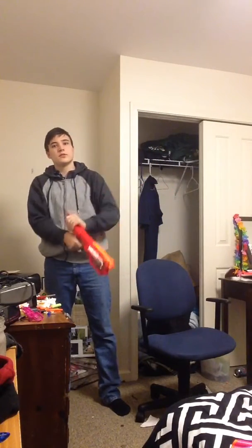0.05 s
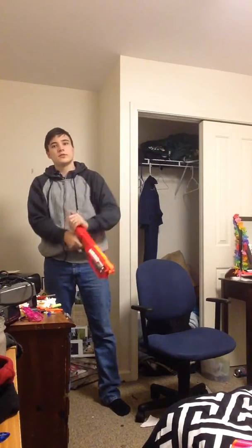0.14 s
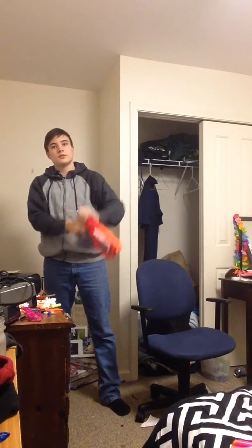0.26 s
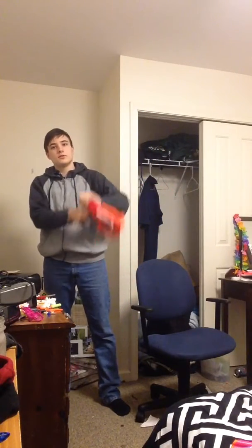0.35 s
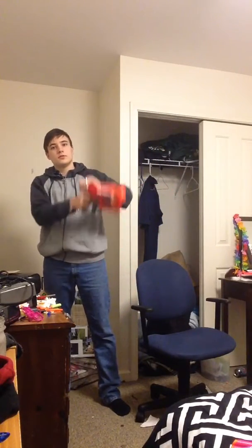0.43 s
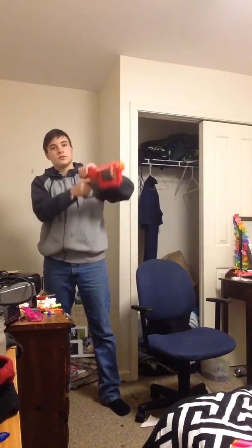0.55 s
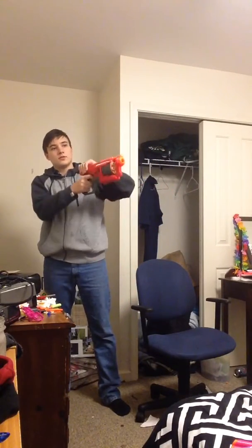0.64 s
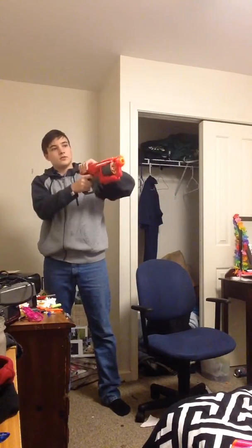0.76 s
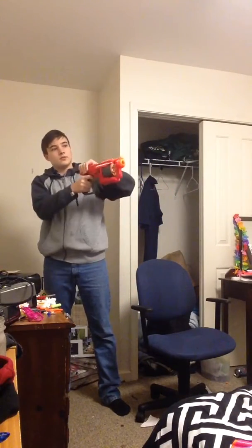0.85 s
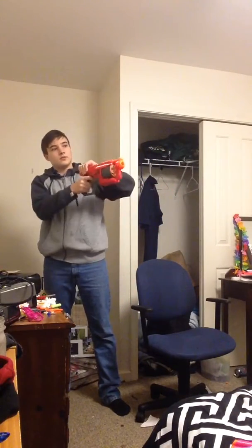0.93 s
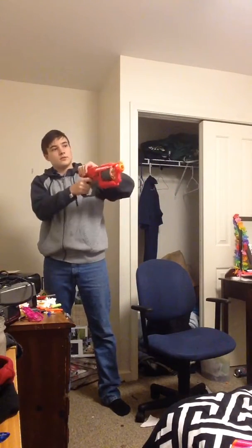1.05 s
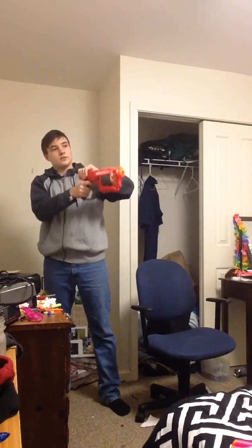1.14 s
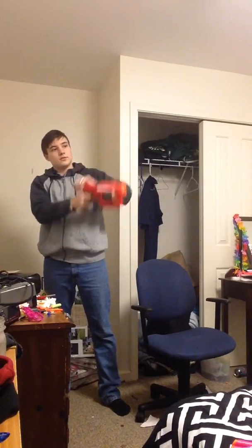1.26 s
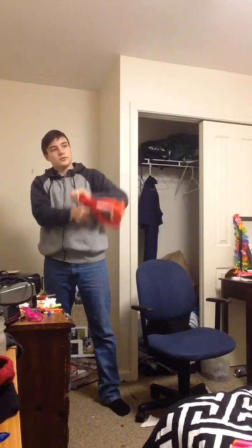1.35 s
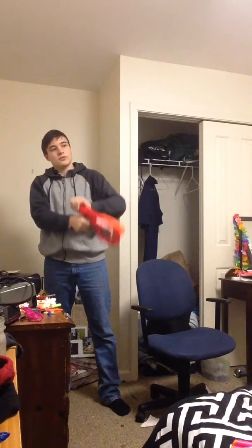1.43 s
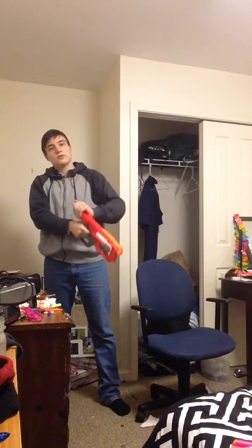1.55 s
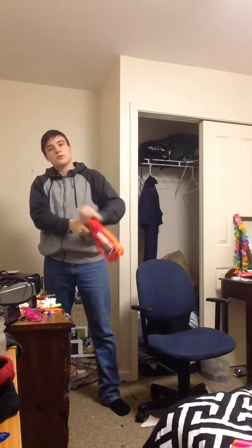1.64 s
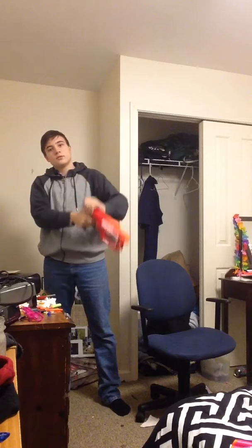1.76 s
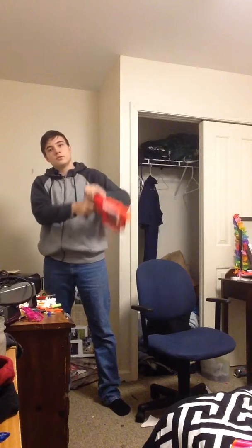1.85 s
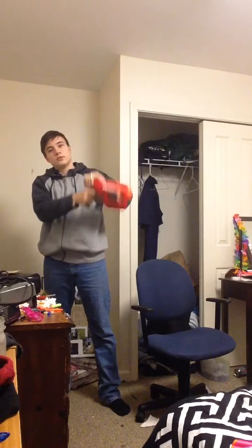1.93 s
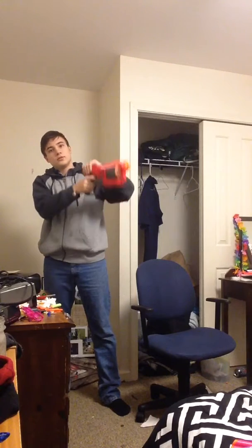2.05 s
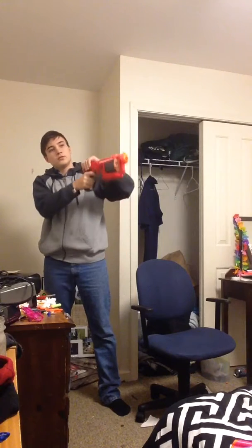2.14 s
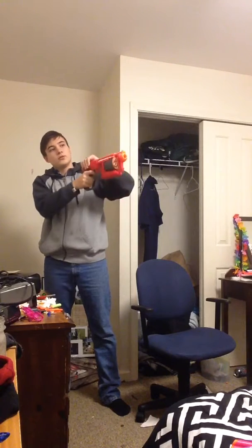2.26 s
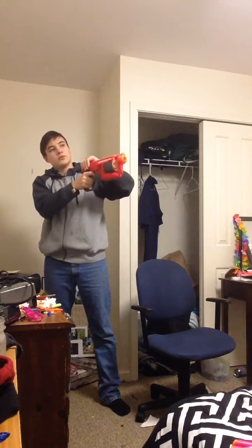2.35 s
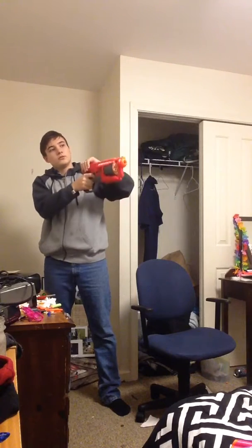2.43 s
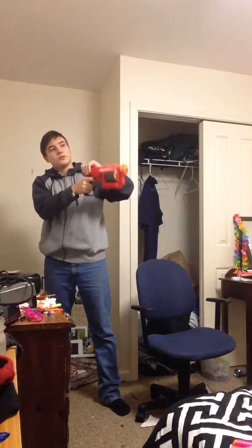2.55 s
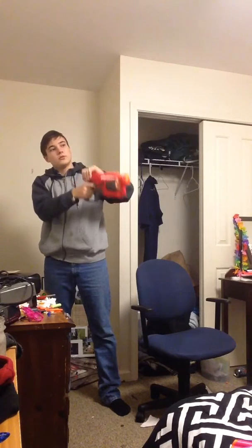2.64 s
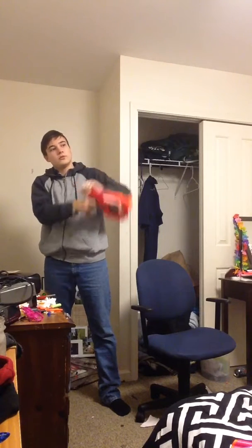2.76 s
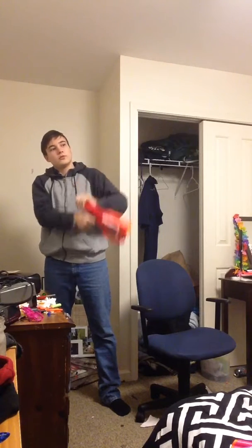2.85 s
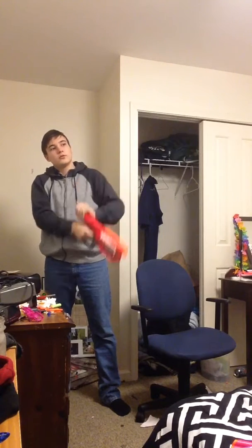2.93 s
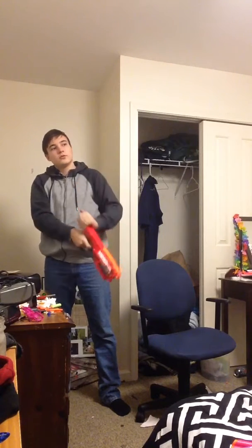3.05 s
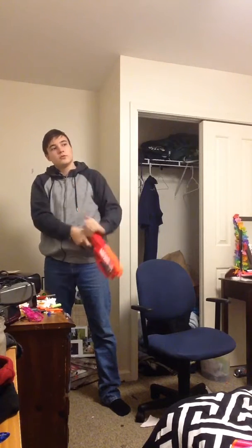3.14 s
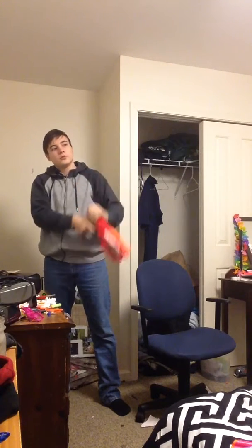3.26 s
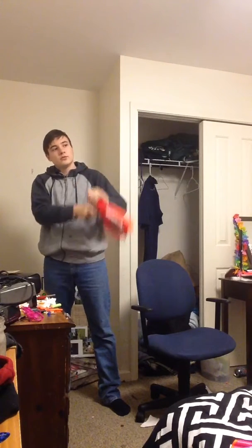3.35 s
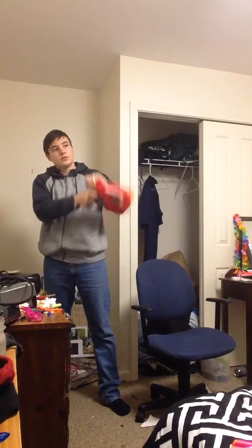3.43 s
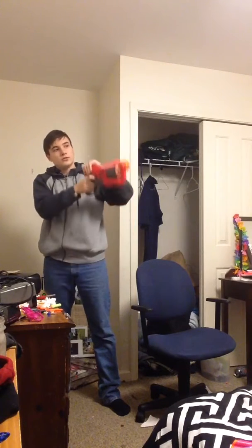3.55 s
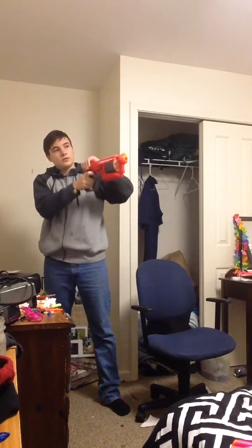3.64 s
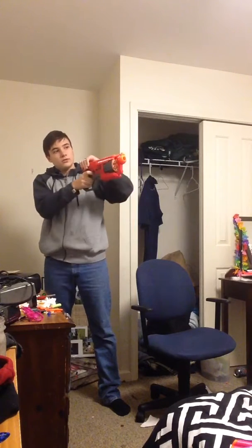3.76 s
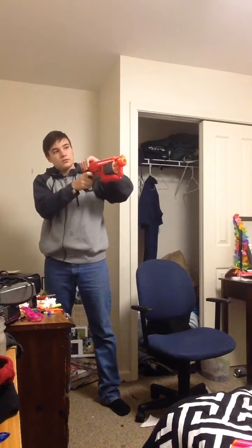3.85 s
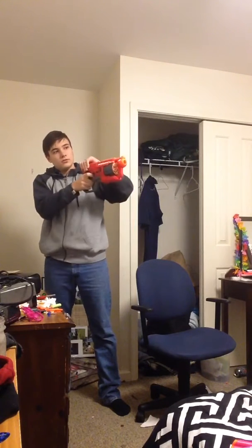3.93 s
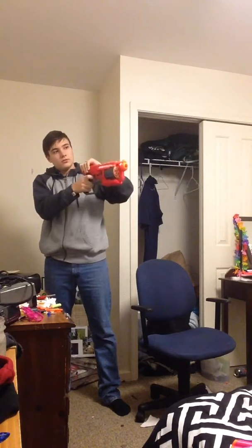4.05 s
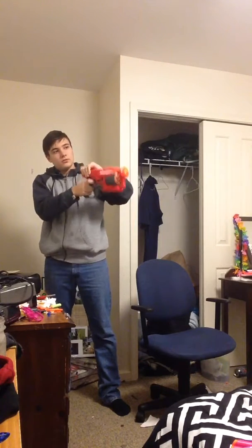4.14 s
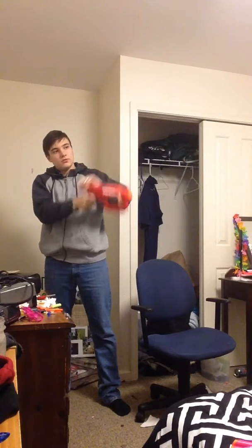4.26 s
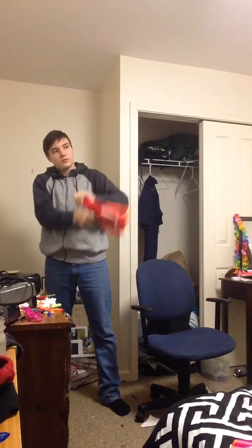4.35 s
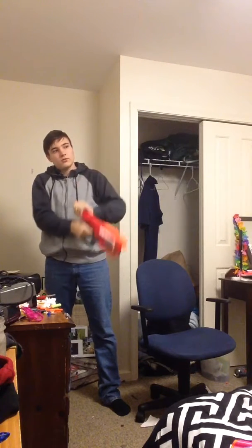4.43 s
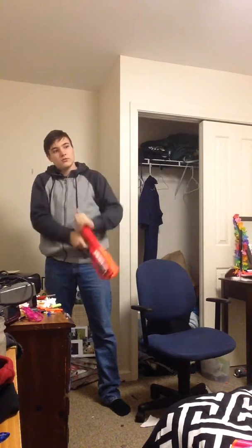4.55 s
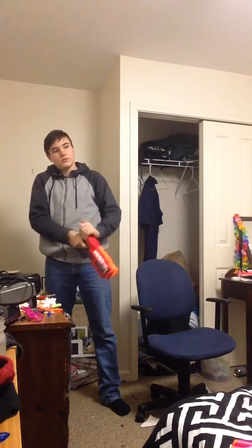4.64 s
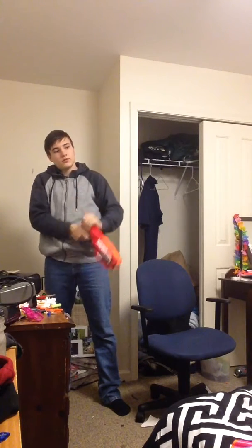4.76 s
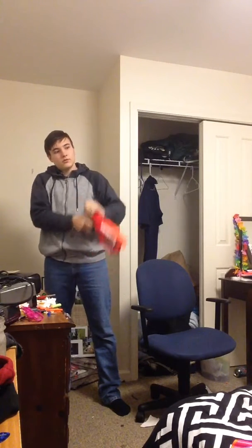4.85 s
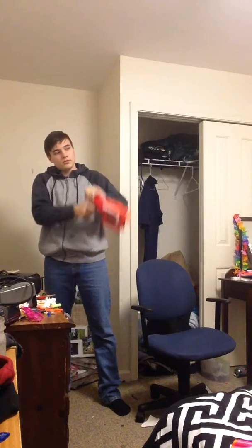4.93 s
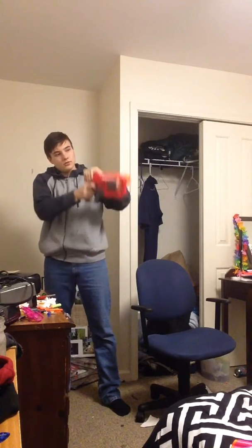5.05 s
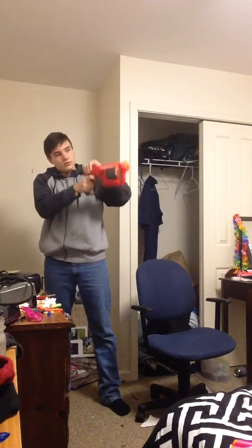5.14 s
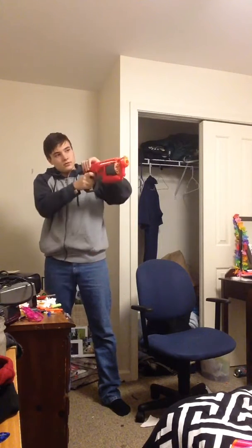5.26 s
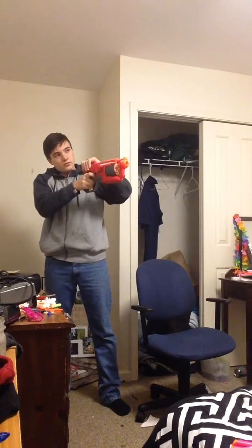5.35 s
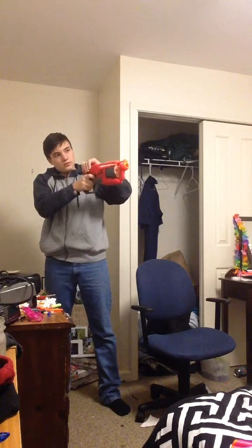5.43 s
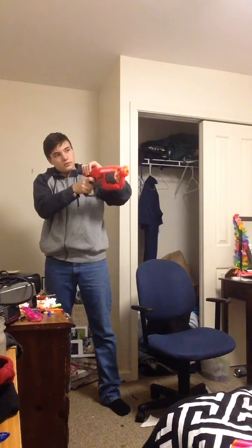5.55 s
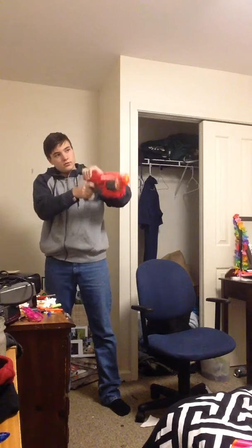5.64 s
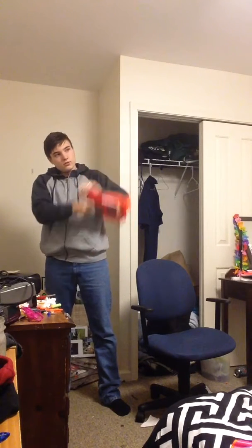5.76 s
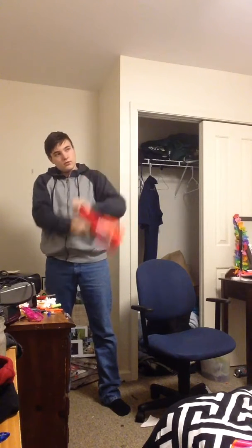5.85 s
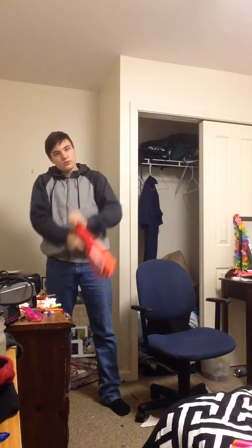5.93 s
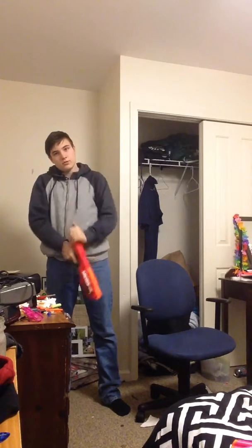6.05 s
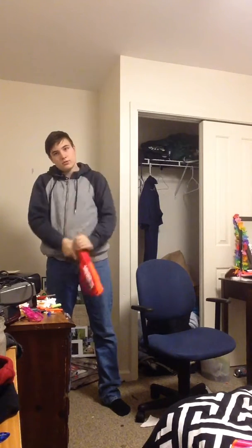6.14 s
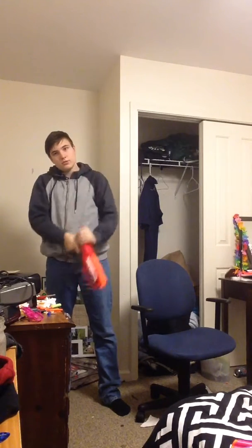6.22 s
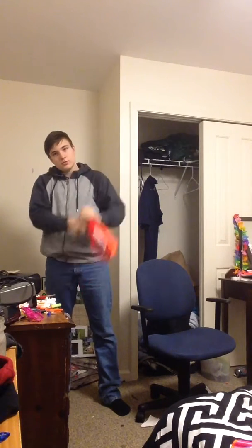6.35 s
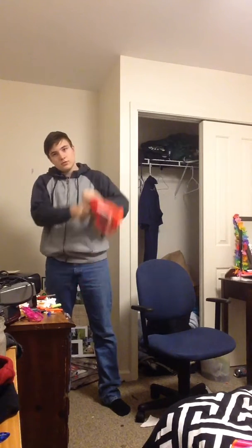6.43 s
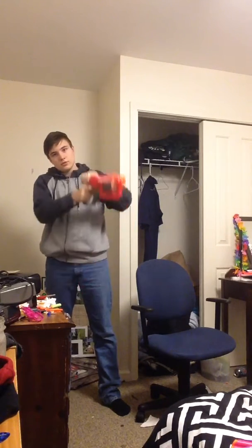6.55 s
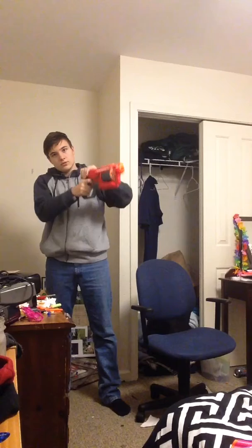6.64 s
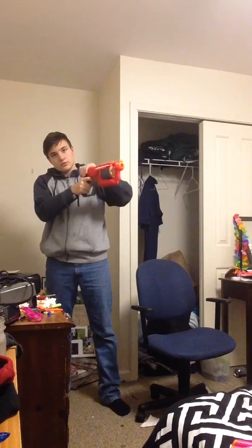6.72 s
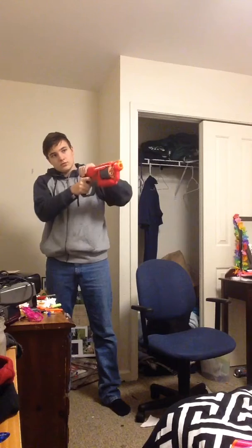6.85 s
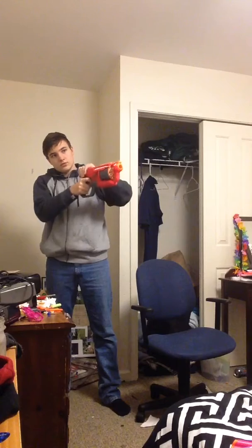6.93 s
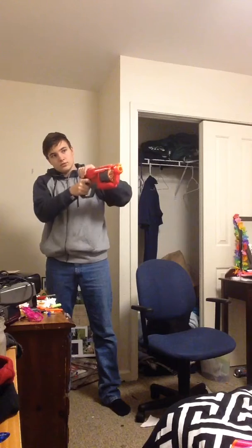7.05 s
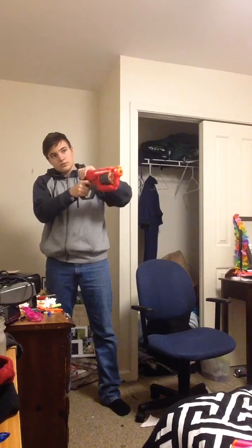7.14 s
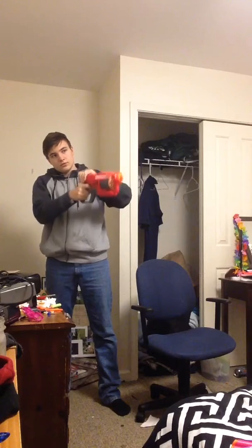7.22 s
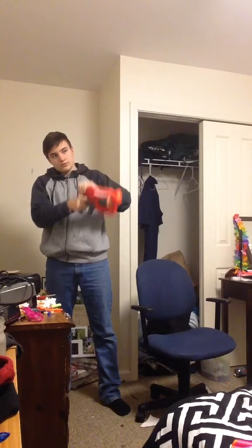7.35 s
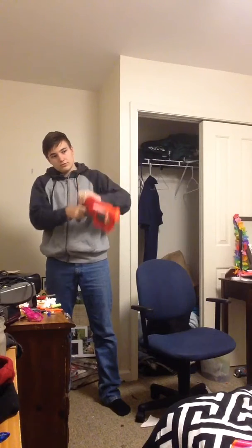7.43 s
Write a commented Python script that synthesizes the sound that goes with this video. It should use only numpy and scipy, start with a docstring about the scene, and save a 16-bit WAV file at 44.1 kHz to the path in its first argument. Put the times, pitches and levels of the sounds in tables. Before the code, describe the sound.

A quiet small bedroom with a faint low hush and barely audible wavering hum. It opens mid-action, in the tail of a clack: a hollow plastic slide scrapes and clacks at 0.04 seconds, then clacks again on its return at 0.35. After a few tiny ticks, the trigger clicks and the spring piston slams at 1.0 with a hard plastic crack and short boomy puff of air; a foam dart smacks the wall at 1.1 and drops with a soft dull thud at 1.6. The same cycle repeats: double clacks around 1.4 and 1.75, shot at 2.5; clacks at 2.95 and 3.25, shot at 4.0; clacks at 4.45 and 4.75, shot at 5.5; clacks at 5.95 and 6.25, last shot at 7.0, wall smack at 7.1, soft drop at 7.3. Every impact is loud, dry-edged and followed by a brief bright room echo, heard from a few steps away.

```python
"""Toy blaster in a bedroom

A plastic spring-piston toy blaster is primed and fired five times in a small carpeted bedroom.
Its slide scrapes (many tiny slips) and clacks at latches and stops (short bursts of taps in a ringing shell).
The trigger frees the piston, which slams home with a boom of air; faint ticks come in between.
The foam dart smacks a wall a tenth of a second later and drops on the floor with soft low thuds.
Echoes and a faint hush with a wavering hum surround it all."""
import sys
import numpy as np
from scipy import signal
from scipy.fft import rfft, irfft
from scipy.io import wavfile
from scipy.ndimage import uniform_filter1d

SR = 44100
rng = np.random.default_rng(int(sys.argv[2]) if len(sys.argv) > 2 else 0)


def transcribe(signal):
    """Save signal, clipped to [-1, 1], as a 16-bit WAV file at the path in sys.argv[1]."""
    frames = np.atleast_2d(signal).T
    limited = np.clip(frames, -1, 1)
    pcm = np.round(limited * 32767).astype(np.int16)
    wavfile.write(sys.argv[1], SR, pcm)


N = 330327  # length in samples

# An energy_db is the middle-band energy, given as a level held for one millisecond.
# Tilts raise or lower the bass or treble of one contact.

# Still room: pitch_hz, level_db (per Hz; only the shape counts)
HUSH_COLOUR = [(12, -32.5), (20, -10.5), (68, 2.5), (96, -11.5), (158, -11), (177, -11.5), (241, -13),
               (328, -12.5), (873, -18.5), (976, -14.5), (1090, -21.5), (8180, -33), (16000, -44)]
HUSH_DB = -68
# Faint hum: pitch_hz, level_db (before HUM_LIFT_DB)
HUM_TONES = [(156.1, -78.5)]
HUM_LIFT_DB = 3.5

# Slide strokes: start_s, main_catch_s, end_s, level_db (at the catch, under spring load)
SLIDE_STROKES = [(-.09, -.03, .03, -42.5), (0.257, .297, .342, -46), (1.33, 1.398, 1.447, -36.5),
                 (1.677, 1.72, 1.754, -44), (2.841, 2.897, 2.958, -35.5), (3.176, 3.218, 3.253, -43),
                 (4.324, 4.398, 4.455, -36.5), (4.652, 4.711, 4.738, -41.5), (5.816, 5.874, 5.94, -38),
                 (6.152, 6.215, 6.234, -40.5)]
# Colour of the dragging slide: pitch_hz, level_db
DRAG_COLOUR = [(59, -59), (100, -28.5), (365, -6), (1080, -6), (1720, -8), (2580, -8.5), (9020, -24.5),
               (14700, -41), (16000, -55.5)]
# The scrape swells, steps up at the catch, then grows a little up to the stop
START_DB, BEFORE_CATCH_DB, END_DB, STEP_S = -15, -4.5, 3, .01

# Dying echoes of a clack struck just before the start: energy_db, bass_tilt_db, treble_tilt_db, rattle_ms
OPENING_TAIL = (-26, 1, -0.5, 27)
# Slide passing catches and the turning drum: start_s, energy_db, bass_tilt_db
CATCH_CLICKS = [(0.0168, -23.5, 0.5), (0.276, -38.5, -12), (0.2981, -22, -16), (0.343, -19, -18),
                (1.3348, -38.5, 1.5), (1.386, -29, -2.5), (1.389, -16.5, -1), (1.687, -45.5, -3),
                (1.7183, -22.5, -4.5), (1.7569, -15.5, -1.5), (2.8515, -43.5, -8), (2.8972, -13, 5.5),
                (2.903, -37.5, -5), (3.185, -43, -3.5), (3.2117, -21.5, -9), (3.2564, -19.5, -0.5),
                (4.3366, -35, -10), (4.3876, -16.5, 7), (4.3923, -16.5, 2), (4.653, -39.5, -5),
                (4.6818, -41.5, -2.5), (4.7, -21.5, -8), (4.74, -18.5, -6), (5.8327, -50, -6),
                (5.8465, -41, -4), (5.8837, -21, -10), (5.8865, -12, 7), (6.1645, -49, 0),
                (6.1788, -43.5, -4), (6.197, -21, -13), (6.2365, -18, 3)]
# Colour of those clicks: pitch_hz, level_db
CATCH_COLOUR = [(35, -62.5), (60, -26), (250, -20), (398, -10), (666, -12), (822, -1), (1200, -5),
                (4420, 0.5), (6580, -5.5), (14600, -22.5), (16000, -39.5)]
CATCH_RATTLE_MS = 8.9
DULL_DB_PER_DB, BRIGHT_DB = 1, -17.5  # catches weaker than BRIGHT_DB lose treble

# Slide reaching either end of its travel: start_s, energy_db, bass_tilt_db, rattle_ms
SLIDE_STOPS = [(0.0374, -10, 8, 4.4), (0.3534, -11, 0, 11), (1.4534, -10, 7, 8), (1.7654, -8.5, -4, 6.6),
               (2.9654, -14, 4, 7.7), (3.2651, -9.5, -1.5, 7.6), (4.463, -13.5, 3.5, 11),
               (4.749, -8.5, -1, 8.8), (5.9451, -10.5, 3, 9.5), (6.2457, -9, -4, 8.2)]
# Colour of those stops: pitch_hz, level_db
STOP_COLOUR = [(18, -63.5), (30, -41.5), (98, -34.5), (179, -7.5), (415, -3.5), (632, -1), (760, 0.5),
               (3060, -2), (9460, -16.5), (14800, -34), (16000, -55)]

# Faint ticks, some of them just before a shot: start_s, energy_db
FAINT_TICKS = [(0.6905, -48), (0.8584, -53), (0.8861, -53.5), (0.9674, -38), (0.998, -40.5), (2.3276, -52),
               (2.3929, -56.5), (2.4258, -52.5), (2.491, -39.5), (3.591, -50.5), (3.9487, -31),
               (4.002, -46), (5.0441, -54), (5.1441, -50.5), (5.2998, -49.5), (5.3839, -46), (5.496, -38),
               (6.5956, -63), (6.7793, -44.5), (6.911, -50.5), (6.9733, -42), (7.011, -41.5)]
# Colour of a faint tick: pitch_hz, level_db
TICK_COLOUR = [(88, -49), (150, -15.5), (979, -8), (1260, -3), (1720, -4.5), (2450, -6), (6390, -17),
               (15100, -44), (16000, -58.5)]
TICK_RATTLE_MS, FIRM_DB, TICK_DULL_DB_PER_DB = 4.1, -39, .15  # ticks below FIRM_DB lose treble

# Trigger frees the piston: start_s, energy_db, bass_tilt_db, treble_tilt_db
PISTON_RELEASES = [(1.0017, -15.5, -7.5, -3), (2.5023, -20, -1.5, .5), (4.0063, -19, -6.5, -5),
                   (5.5037, -13.5, 1, 0), (7.0156, -20, -4.5, -1)]
RELEASE_RATTLE_MS = 2.9
# Piston slams home: start_s, energy_db, bass_tilt_db, treble_tilt_db, rattle_ms
PISTON_SLAMS = [(1.0094, -19, -5, -3, 18), (1.0124, -6.5, -3.5, -2, 15), (2.5126, -5.5, -5.5, 0, 9.8),
                (4.0169, -5.5, -2.5, -1.5, 10), (5.5135, -11, -3, 3, 12), (5.517, -8.5, -4, 0, 10.8),
                (7.0242, -11, -0.5, 0, 4.8), (7.027, -6.5, -1.5, -3.5, 5.2)]
# Colour of releases and slams: pitch_hz, level_db
PISTON_COLOUR = [(18, -58), (30, -24), (70, -9.5), (210, -7), (319, -0.5), (889, -16.5), (1190, -7.5),
                 (1960, -10.5), (3770, -10), (14800, -31), (16000, -50.5)]
# Air tube emptied by the piston: pitch_hz, start_level_db, time_to_fall_60_db_s
TUBE_MODES = [(90.5, -36, 0.71), (174, -42, .12), (210, -41.5, .12), (274, -28, 0.13), (341, -24, .15),
              (412, -25.5, 0.44), (450, -31, 0.14)]
TUBE_DELAY_S = 0.0092  # the piston needs a moment to pick up speed

# Darts on the wall: start_s, tip_energy_db, bass_tilt_db, body_delay_ms, body_energy_db
WALL_HITS = [(1.1135, -10, -0.5, 5.4, -33), (2.62, -11.5, -0.5, 4.5, -30), (4.1128, -10, -1.5, 2.6, -13.5),
             (5.6135, -11, -8.5, 3.5, -14.5), (7.1238, -10, -1.5, 3.28, -14)]
# Colour of a dart smack: pitch_hz, level_db
SMACK_COLOUR = [(18, -43), (30, -13.5), (239, 1.5), (499, -7), (988, -11.5), (1910, -3), (2480, -4),
                (3310, -8.5), (7870, -17.5), (14800, -44.5), (16000, -66.5)]
DART_RATTLE_MS = 1.5
TIP_TREBLE_DB, BODY_BASS_DB = -3, -3.5  # the rubber tip lands dull, the foam body slaps thin
# A faint low thump a fixed moment after each smack, perhaps an echo
AFTER_THUMP_S, AFTER_THUMP_DB, AFTER_THUMP_BASS_DB, AFTER_THUMP_MS = 0.014, -29.5, 10, 5.6
# Darts landing on carpet: start_s, level_db, pitch_hz
CARPET_DROPS = [(1.628, -38.5, 188), (2.739, -35, 210), (3.122, -50, 147), (4.23, -39, 278),
                (4.656, -33.5, 188), (4.839, -47, 175), (4.926, -49, 188), (4.968, -47.5, 180),
                (6.099, -43, 149), (6.528, -60, 78.4), (7.306, -35.5, 207)]

# Resonances of the hollow plastic shell: pitch_hz, width_hz, lift_db (before a small random change)
SHELL_MODES = [(272, 69, 4.5), (400, 63, 5), (1240, 32, -2), (1740, 48, 2), (2120, 150, 3), (2430, 190, 2),
               (2885, 110, 3), (3880, 360, 2), (5160, 100, 1), (6470, 350, 3.5), (7620, 350, 4)]
# Resonances of the wall panel: pitch_hz, width_hz, lift_db (before a small random change)
WALL_MODES = [(228, 50, 2), (489.6, 160, 6.9), (790, 830, 8.5), (1450, 270, 1.8), (2350, 210, 2.7),
              (3720, 100, 0.67)]
# How long echoes last: pitch_hz, time_to_fall_60_db_s
ECHO_TIMES = [(60, 0.28), (150, 0.17), (300, 0.33), (700, 0.43), (1200, 0.5), (2200, 0.36), (4850, 0.39),
              (9000, 0.31), (14000, 0.22)]
FAR_WALL_MS, FAR_WALL_WIDTH_MS, FAR_WALL_DB = 22, 2.1, 1.5  # echoes from the far end of the room
PATTERN_S = .31  # how long one echo pattern stays in use

MIC_LOW_HZ, EDGE_HZ = 32, 15700  # lowest and highest pitch let through


def gain_of(db):
    """Turns decibels into a multiplier for the sound wave."""
    return 10 ** (np.asarray(db) / 20)


def read(points, hz):
    """Reads a table of (pitch, value) between its points, on a log pitch scale."""
    f, value = np.transpose(points)
    return np.interp(np.log(hz + 1), np.log(f + 1), value)


def add(mix, s, sound):
    """Mixes a sound in at s seconds."""
    part = mix[round(s * SR):][:len(sound)]
    part += sound[:len(part)]


def band(x, kind, hz):
    """Keeps part of the pitch range with a gentle filter that never looks ahead."""
    return signal.sosfilt(signal.butter(2, hz, kind, fs=SR, output="sos"), x)


def ring(colour, modes, bass_db=0, treble_db=0):
    """How a body rings after one tap; the spot touched sets how much each resonance takes."""
    f = abs(np.fft.fftfreq(4096, 1 / SR))
    hz, width, lift_db = np.transpose(modes)[:, :, None]
    lift_db = lift_db + rng.standard_normal(hz.shape)
    peaks_db = lift_db / (1 + (2 * (f - hz) / width) ** 2)
    db = read(colour, f) + peaks_db.sum(0)
    db += bass_db / (1 + (f / 650) ** 4)
    db += treble_db / (1 + (4500 / (f + 1)) ** 4)
    middle = (f > 700) * (f < 6000)
    db -= 10 * np.log10(np.mean(gain_of(2 * db) * middle))  # unit energy in the middle band
    log_gain = np.log(gain_of(np.maximum(db, -100)))
    # this phase makes the sound start at once and then die away
    spectrum = np.exp(log_gain - 1j * signal.hilbert(log_gain).imag)
    return np.fft.ifft(spectrum).real[:3000]


def blows(table, colour, modes, rattle, crunch):
    """Each contact is a short crunch and a dying rattle of random taps, ringing in the body.

    Rows: start_s, energy_db, bass_tilt_db, treble_tilt_db, rattle_ms.
    Output 0 goes straight to the microphone; output 1, smoother as if summed over all directions, feeds the room.
    """
    out = np.zeros((2, N))
    ms = 1000 * np.arange(3000) / SR
    for s, db, bass_db, treble_db, rattle_ms in table:
        size, chance = rng.standard_normal(len(ms)), rng.random(len(ms))
        taps = rattle * size * gain_of(3.0 * rng.exponential(1, len(ms)))
        taps *= chance < 1500 / SR  # about 1500 taps a second
        taps *= np.exp(-ms / max(rattle_ms, .5))
        taps += 0.8 * crunch * size * np.exp(-ms / 1.6) * (1 - np.exp(-ms / .7))
        taps[round(.0007 * SR)] = crunch  # the main contact
        # keep the timing but make all pitches equally strong
        spread = irfft(np.exp(1j * np.angle(rfft(taps)))) * np.exp(-ms / 15)
        body = gain_of(db) * np.sqrt(SR / 1000) * ring(colour, modes, bass_db, treble_db)
        add(out[0], s, signal.fftconvolve(taps / np.linalg.norm(taps), body))
        add(out[1], s, signal.fftconvolve(spread / np.linalg.norm(spread), body))
    return out


def room(x, wet_db, gap_ms, early_db, count=3):
    """Adds dense echoes of random sign to the direct sound, each pitch range dying at its own speed.

    Random echo patterns take turns, so that no fixed pitches stand out in the echoes.
    """
    out = x[0] + 0
    at = np.arange(0, SR // 2, 12)
    turn = (np.arange(N) / SR / PATTERN_S).astype(int) % count
    for k in range(count):
        taps = np.zeros(SR // 2 + 12)
        taps[at + rng.integers(0, 12, len(at))] = rng.choice([-1., 1.], len(at))
        hz, t, z = signal.stft(taps, SR, nperseg=256)
        fade = gain_of(-60 * t / read(ECHO_TIMES, hz)[:, None])
        tail = signal.istft(z * fade, SR, nperseg=256)[1]
        ms = 1000 * np.arange(len(tail)) / SR
        tail = tail * (1 - np.exp(-(ms / gap_ms) ** 2))  # echoes build up after the first wall
        tail = tail * gain_of(early_db * np.exp(-ms / 30))  # near walls and ceiling answer loudest
        far_wall = np.exp(-((ms - FAR_WALL_MS) / FAR_WALL_WIDTH_MS) ** 2)
        tail = tail * gain_of(FAR_WALL_DB * far_wall)
        echoes = signal.oaconvolve(x[1] * (turn == k), tail / np.linalg.norm(tail))[:N]
        out += gain_of(wet_db) * echoes
    return out


def air():
    """The hush of the house is noise with slow uneven patches; a faint hum wavers in pitch."""
    frames, hz = N // 256 + 5, np.fft.rfftfreq(1024, 1 / SR)
    a, b, patches = rng.standard_normal((frames, 513, 3)).T
    patches = uniform_filter1d(uniform_filter1d(patches, 12, 0), 14, 1)
    level_db = read(HUSH_COLOUR, hz)[:, None] + 1.3 * patches / patches.std()
    hush = signal.istft((a + 1j * b) * gain_of(level_db), nperseg=1024, noverlap=768)[1][:N]
    drift = np.cumsum(uniform_filter1d(rng.standard_normal(N), 4000)) * 300 / SR
    t = np.arange(N) / SR
    hum = sum(gain_of(db + HUM_LIFT_DB) * np.sin(2 * np.pi * (f * t + drift)) for f, db in HUM_TONES)
    return gain_of(HUSH_DB) * hush / hush.std() + hum


def slide():
    """Dense tiny slips on the rails make the plastic shell ring as a scrape."""
    out = np.zeros(N)
    for start, catch, end, level_db in SLIDE_STROKES:
        t = np.arange(max(start, 0), end, 1 / SR)
        swell_db = np.interp(t, [start, catch - STEP_S, catch, end], [START_DB, BEFORE_CATCH_DB, 0, END_DB])
        slips = rng.standard_normal(len(t)) * (rng.random(len(t)) < 2500 / SR)
        slips *= gain_of(1.8 * rng.exponential(1, len(t)))
        shell = ring(DRAG_COLOUR, SHELL_MODES, bass_db=-3.5, treble_db=3.0)
        scrape = signal.fftconvolve(slips, shell)[:len(t)]
        soft_ends = signal.windows.tukey(len(t), .1)
        add(out, t[0], gain_of(level_db + swell_db) * scrape / scrape.std() * soft_ends)
    return out


def catches():
    """Catches clicking past the slide tap the shell, weaker ones duller; the opening tail comes first."""
    clicks = [(0.00048, *OPENING_TAIL)]
    for s, db, bass_db in CATCH_CLICKS:
        treble_db = DULL_DB_PER_DB * min(db - BRIGHT_DB, 0)
        clicks.append((s, db, bass_db, treble_db, CATCH_RATTLE_MS))
    return blows(clicks, CATCH_COLOUR, SHELL_MODES, rattle=1.3, crunch=0.44)


def end_stops():
    """The slide hits the end of its travel and makes the shell clack."""
    stops = [(s, db, bass_db, 0, ms) for s, db, bass_db, ms in SLIDE_STOPS]
    return blows(stops, STOP_COLOUR, SHELL_MODES, rattle=0.65, crunch=0.55)


def faint_ticks():
    """Faint ticks, some of them just before a shot, ring in the shell; the weakest sound duller."""
    ticks = [(s, db, 0, TICK_DULL_DB_PER_DB * min(db - FIRM_DB, 0), TICK_RATTLE_MS)
             for s, db in FAINT_TICKS]
    return blows(ticks, TICK_COLOUR, SHELL_MODES, rattle=0.83, crunch=.3)


def piston():
    """The trigger frees the piston with a click; then the piston slams home and shakes the shell."""
    hits = [(*row, RELEASE_RATTLE_MS) for row in PISTON_RELEASES] + PISTON_SLAMS
    return blows(hits, PISTON_COLOUR, SHELL_MODES, rattle=0.6, crunch=.7)


def tube():
    """The piston's push of air makes the tube boom for a moment, all its tones starting together."""
    t = np.arange(SR // 3) / SR
    boom = sum(gain_of(db - 60 * t / t60) * np.sin(2 * np.pi * hz * t) for hz, db, t60 in TUBE_MODES)
    boom = boom * (1 - np.exp(-t / 0.0023))
    out = np.zeros(N)
    for s, *_ in PISTON_RELEASES:
        add(out, s + TUBE_DELAY_S, boom)
    return out * gain_of([[0], [-8]])  # direct sound, then the weaker feed to the room


def wall_hits():
    """The dart's rubber tip, then its foam body, make the wall panel ring; a faint low thump follows."""
    taps = []
    for s, tip_db, bass_db, delay_ms, body_db in WALL_HITS:
        taps.append((s, tip_db, bass_db, TIP_TREBLE_DB, DART_RATTLE_MS))
        taps.append((s + delay_ms / 1000, body_db, BODY_BASS_DB, 0, DART_RATTLE_MS))
        taps.append((s + AFTER_THUMP_S, AFTER_THUMP_DB, AFTER_THUMP_BASS_DB, 0, AFTER_THUMP_MS))
    return blows(taps, SMACK_COLOUR, WALL_MODES, rattle=0.3, crunch=0.77)


def thuds():
    """Foam on carpet gives a soft low push, a tone plus low noise, that barely rings."""
    out, t = np.zeros(N), np.arange(4000) / SR
    for s, db, hz in CARPET_DROPS:
        push = 0.54 * np.sin(2 * np.pi * hz * t)
        push += 4.5 * band(rng.standard_normal(len(t)), "band", [70, 280])
        add(out, s, gain_of(db) * push * np.exp(-t / 0.03) * (1 - np.exp(-t / 0.005)))
    return out * gain_of([[0], [-4]])  # direct sound, then the weaker feed to the room


def scene():
    """The blaster is held up to fire and down to prime; darts strike across the room."""
    priming = room(slide() + catches() + end_stops(), 2.6, gap_ms=1.0, early_db=8.0)
    shots = room(faint_ticks() + piston() + tube(), 4.6, gap_ms=4.6, early_db=8.5)
    darts = room(wall_hits() + thuds(), 2.1, gap_ms=0.8, early_db=3)
    return (air() + priming + shots + darts)[None]


def record(dry):
    """The microphone drops the deepest bass, rounds off the hardest peaks and cuts the highest treble."""
    dry = band(dry, "high", MIC_LOW_HZ)
    knee, space = .7, .26  # rounding starts at the knee and levels off at knee + space
    over = np.maximum(abs(dry) - knee, 0)
    held = dry - np.sign(dry) * (over - space * np.tanh(over / space))
    treble_cut = signal.firwin(511, EDGE_HZ, window=("kaiser", 9), fs=SR)
    return signal.oaconvolve(held, treble_cut[None], "same")


dry = scene()
out = record(dry)
transcribe(out)
```